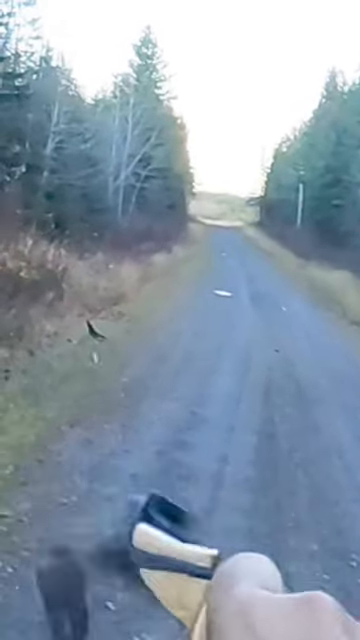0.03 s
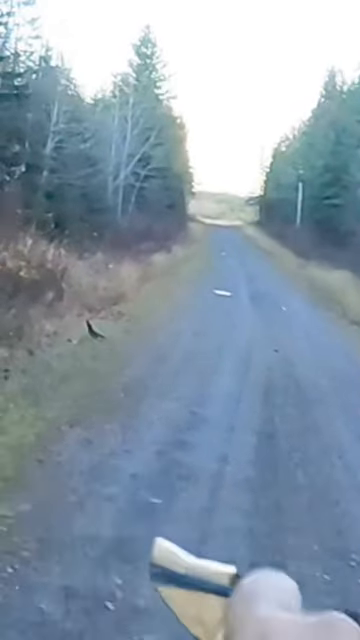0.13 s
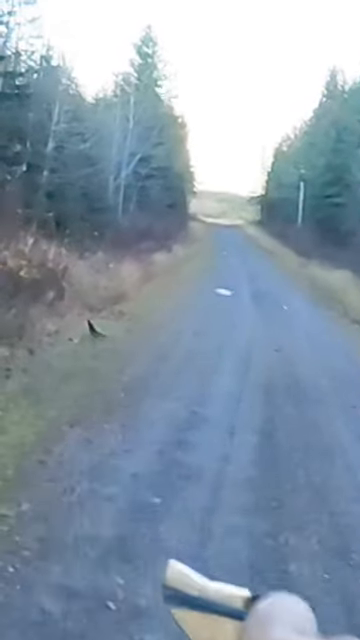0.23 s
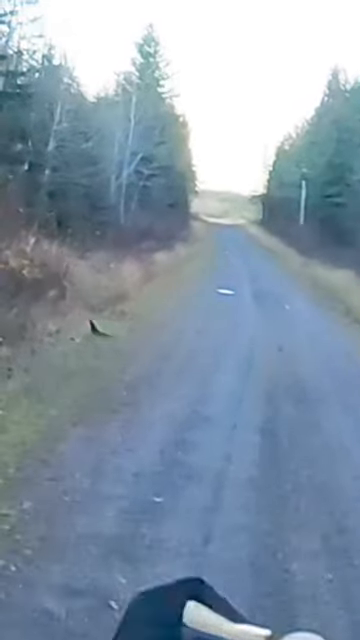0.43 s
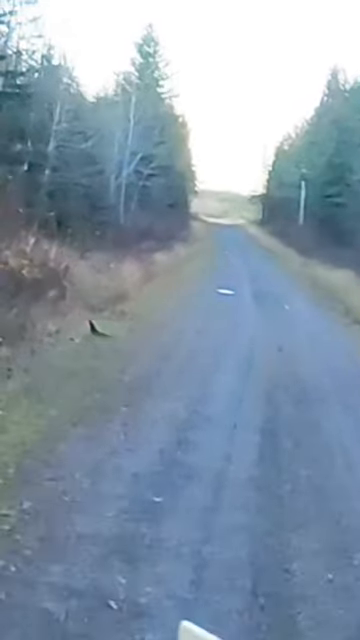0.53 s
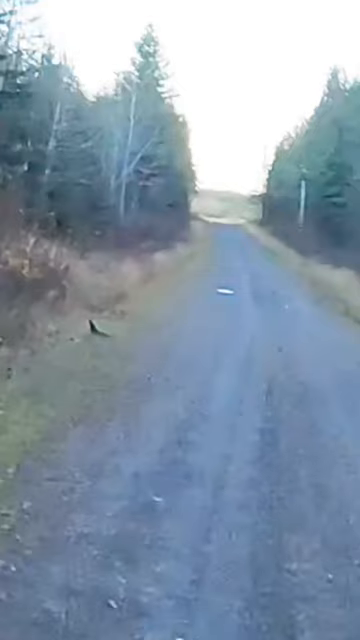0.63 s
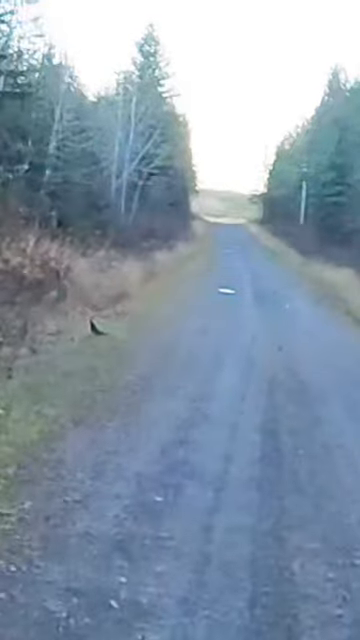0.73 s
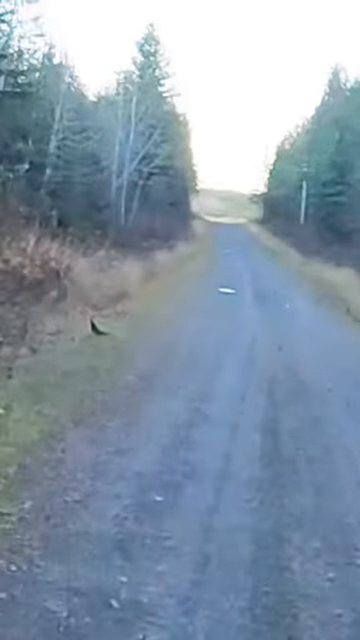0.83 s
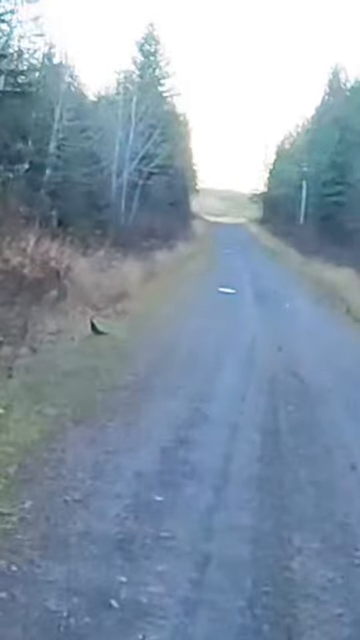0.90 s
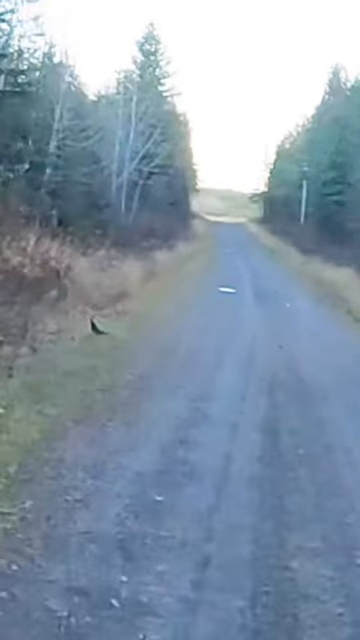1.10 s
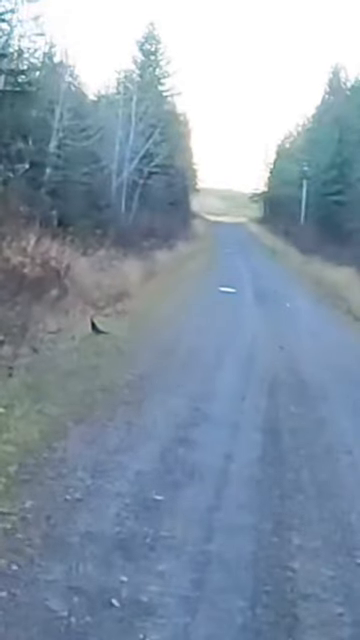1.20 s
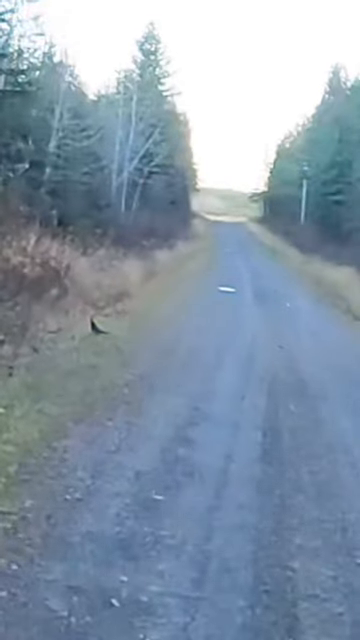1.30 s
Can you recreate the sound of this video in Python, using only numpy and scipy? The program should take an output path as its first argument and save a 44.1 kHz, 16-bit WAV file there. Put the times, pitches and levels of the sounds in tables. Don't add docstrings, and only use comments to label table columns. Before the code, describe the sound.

A slingshot fires close to a dull, muffled microphone. Soft air, low wind rumble and sleeve rustle come first, with tiny rubber creaks from 0.1 s. At 0.22 s two low pops lead into a rising swish, then a loud, short ringing snap at 0.28 s with recoil thumps. Bands flap until 0.41 s; faint distant knocks follow around 0.48-0.6 s as the tree echo fades into quiet air.

```python
import sys
import numpy as np
from scipy import signal
from scipy.fft import rfft, irfft
from scipy.io import wavfile

SR = 44100
rng = np.random.default_rng(int(sys.argv[2]) if len(sys.argv) > 2 else 0)


def int16_out(signal):
    q = np.round(np.clip(np.atleast_2d(signal).T, -1, 1) * 32767)
    wavfile.write(sys.argv[1], SR, q.astype(np.int16))


def attenuation_scalar(level_db):
    decades = np.asarray(level_db, float) / 20
    return 10 ** decades


N = 59535


def read(points, hz):
    f, value = np.transpose(points)
    return np.interp(np.log(hz + 1), np.log(f + 1), value)


def over_time(curve):
    return np.interp(np.arange(N) / SR, *np.transpose(curve))


def sides(pan_db):
    left_right = attenuation_scalar(np.array([[pan_db], [-pan_db]]) / 2)
    return left_right / np.cosh(pan_db * np.log(10) / 40)


# f/Hz, likeness/0..1
PORT_LIKENESS = [(60, 0.98), (120, 1), (230, 0.92), (460, 0.53), (920, 0.8), (1820, 0.94), (3600, 0.12)]


def noise(spectrum, like, flutter_hz, flutter_db):
    hz = np.fft.rfftfreq(N, 1 / SR)
    left, other, slow = rfft(rng.standard_normal((3, N)), axis=1)
    same = np.clip(like * read(PORT_LIKENESS, hz), 0, 1)
    right = same * left + np.sqrt(1 - same ** 2) * other
    x = irfft(np.array([left, right]) * attenuation_scalar(read(spectrum, hz)), N, axis=1)
    flutter = irfft(slow * np.exp(-(hz / flutter_hz) ** 2), N)
    x = x * attenuation_scalar(flutter_db * flutter / flutter.std())
    return x / x.std()


def pushes(table):
    t = np.arange(N) / SR
    out = np.zeros((2, N))
    for s, width, db, way, pan_db in table:
        out += np.sign(way) * attenuation_scalar(db) * sides(pan_db) * np.exp(-((t - s) / width) ** 2)
    return out


# f/Hz, level/dB
PUFF = [(100, -20), (300, 1), (1000, -0.5), (2400, -8.5), (3400, -19), (4200, -52.5), (5000, -100)]
# f/Hz, phase/radians
PORT_LEAD = [(400, .7), (800, 1.1), (1400, .6), (1800, .4), (3000, .5)]


def rings(table, puff_db, rise_share=.7):
    out, t = np.zeros((2, N)), np.arange(N) / SR
    wobble = .03
    puff = attenuation_scalar(puff_db) * noise(PUFF, like=1.02, flutter_hz=306.7, flutter_db=5.0)
    for s, hz, db, ring, pan_db in table:
        u = np.clip((t - s) / ring, -30, 30)
        shape = 2 / (np.exp(-u * 2 / rise_share) + np.exp(u * 1.5))
        lead = np.array([[0], [read(PORT_LEAD, hz)]])
        bend = wobble * hz * ring * np.sin(2.5 * u)
        tone = np.cos(2 * np.pi * hz * (t - s) + lead + bend)
        out += attenuation_scalar(db) * sides(pan_db) * shape * (tone + puff)
    return out


# f/Hz, level/dB
AIR = [(200, -19.5), (600, 2.5), (1200, 1), (1800, -8), (2200, -18), (3200, -35), (4000, -53.5),
       (5000, -100)]


def forest_air():
    return attenuation_scalar(-59.5) * noise(AIR, like=1.01, flutter_hz=30.14, flutter_db=0.4)


# f/Hz, level/dB
ECHO = [(200, -22.5), (600, -8), (1300, -1), (1900, -0.5), (2400, -18), (3050, -15), (3700, -23.5),
        (4600, -91)]


def forest_echo():
    start_s, rise_s, level_db, t60_s = 0.32, 0.09, -48.5, 1.67
    u = np.maximum(np.arange(N) / SR - start_s, 0)
    tail = (1 - np.exp(-u / rise_s)) * attenuation_scalar(level_db - 60 * u / t60_s)
    return tail * noise(ECHO, like=1.1, flutter_hz=59.2, flutter_db=1.0)


# f/Hz, level/dB
RUMBLE = [(3, -10), (10, 2), (25, -10), (50, -14), (80, -25.5), (150, -46), (300, -92.5)]


def wind():
    return attenuation_scalar(-36.5) * noise(RUMBLE, like=.9, flutter_hz=6.6, flutter_db=0.5)


# f/Hz, level/dB
RUSTLE = [(40, -35), (90, 2), (200, -2), (400, -7), (600, -20), (900, -46.5), (1500, -86.5)]
# t/s, level/dB
SLEEVE = [(0.0, -50.5), (0.15, -50), (0.258, -40), (0.45, -65.5), (0.526, -66), (0.804, -63.5), (1.0, -56),
          (1.12, -54.5), (1.244, -56), (1.35, -55)]


def sleeve():
    return attenuation_scalar(over_time(SLEEVE) + 4) * noise(RUSTLE, like=.98, flutter_hz=25, flutter_db=1.0)


# t/s of peak, f/Hz, level/dB, ring/s, pan/dB (left over right)
CREAKS = [
    (.105, 1500, -58, 0.0037, 3.5),
    (.143, 1890, -55, .0012, 2),
    (.172, 2000, -61, 0.0051, -1),
    (.195, 3000, -64, 0.0031, 6),
    (.1965, 810, -33, .003, 4.5),
    (.199, 455, -39, 0.0057, 6),
]


def draw_creaks():
    return rings(CREAKS, puff_db=-7)


# t/s of peak, f/Hz, level/dB, ring/s, pan/dB
LANDING = [(0.58, 1500, -49, 0.0014, 3), (.477, 760, -43, 0.0018, -1), (.4850, 1080, -36, 0.0025, -6.5),
           (.4852, 470, -47, .002, -6), (.483, 280, -45, .004, -4), (.532, 300, -49, .005, 1),
           (.4851, 750, -49, .002, -4), (.5395, 2300, -54, .001, 1), (.5323, 1550, -38, 0.0015, -2),
           (0.459, 1200, -49, 0.003, 0), (.588, 1890, -50, 0.00079, 6), (.696, 596, -65, 0.0015, 6.5)]


def landing():
    return rings(LANDING, puff_db=-9, rise_share=.35)


# t/s, half width/s, level/dB, push/+1 or -1, pan/dB
JOLTS = [(.2165, 0.0056, -12.5, -1, -1.5), (.2325, 0.0055, -12.5, -1, -0.5), (.245, .004, -23.5, 1, -5),
         (.263, 0.0091, -9.5, 1, -2.5), (.2805, .003, -28, -1, -1), (.2788, .0014, -18, 1, -8),
         (.2818, .0014, -18, -1, -20), (.2885, .0045, -10, 1, -1), (.299, 0.0064, -18, -1, -22.5),
         (.415, .01, -32, 1, 0), (.295, 0.0054, -22.5, 1, 20), (.342, .012, -31.5, 1, -12.5),
         (.47, 0.027, -25, -1, -4), (.525, 0.0224, -24.5, 1, -3.5)]


def recoil():
    return pushes(JOLTS)


# t/s of peak, f/Hz, level/dB, ring/s, pan/dB
FLAPS = [(.306, 1680, -29, 0.0014, 5.5), (.3095, 800, -33, 0.0014, -10), (.297, 3000, -43, .002, -3),
         (.314, 3000, -48, .002, 0), (.3145, 1520, -28.5, 0.0018, 1.5), (.333, 1340, -35.5, 0.0017, -5),
         (.335, 3050, -52, 0.0028, 3.5), (.343, 1660, -37.5, 0.0015, 1), (.3435, 2330, -49, 0.0024, -3),
         (.371, 493, -41, 0.0013, -3), (.390, 1390, -48, 0.0022, -1), (.4143, 1600, -41.5, 0.0013, -2)]


def flaps():
    return rings(FLAPS, puff_db=-8, rise_share=.4)


# t/s, level/dB
SWISH_SPEED = [(0.17, -56), (0.196, -42), (0.226, -37), (0.264, -26), (0.274, -28), (0.288, -24.5),
               (0.3, -38), (0.31, -35), (0.36, -61.5)]
# f/Hz, level/dB
SWISH_TONE = [(100, -28), (300, 1), (800, -0.5), (1450, -0.5), (1900, -2.5), (2500, -15.5), (3070, -21),
              (4100, -46.5), (5000, -100)]
# t/s, f/Hz
WHISTLE = [
    (.19, 1850),
    (.24, 1850),
    (.264, 1400),
    (.3, 1500),
]


def swish():
    t = np.arange(N) / SR
    gate = np.clip((t - .15) / 0.01, 0, 1) * np.clip((.42 - t) / 0.079, 0, 1)
    level_db = np.minimum(over_time(SWISH_SPEED) + 0.5, -24)
    air = noise(SWISH_TONE, like=0.98, flutter_hz=149, flutter_db=1)
    whistle_width_hz, whistle_db = 350, -10
    turn = np.exp(2j * np.pi * np.cumsum(over_time(WHISTLE)) / SR)
    r = np.exp(-np.pi * whistle_width_hz / SR)
    whistle = (turn * signal.lfilter([1], [1, -2 * r, r * r], air / turn)).real
    return gate * attenuation_scalar(level_db) * (air + attenuation_scalar(whistle_db) * whistle / whistle.std())


# t/s, half width/s, level/dB, push/+1 or -1, pan/dB
POPS = [
    (.2156, .0004, -12, 1, 8),
    (.21615, .00028, -11, -1, 12),
    (.2167, .0003, -22, 1, -14),
    (.2176, .0003, -15, 1, 14),
    (.2183, .00042, -6.5, -1, 14),
    (.21812, .0004, -18, -1, -20),
]
# t/s, half width/s, level/dB, push/+1 or -1, pan/dB
AFTERPOPS = [
    (.2206, .0004, -18, -1, 8),
    (.2227, .0006, -18, -1, 8),
    (.2255, .0005, -22, 1, 6),
    (.4838, .0005, -40, -1, -8),
]


def pouch_pops():
    return pushes(POPS) + pushes(AFTERPOPS)


# t/s of peak, f/Hz, level/dB, ring/s, pan/dB
SLAPS = [(.2762, 1400, -9, .0022, -2), (.2791, 1700, -5, .0024, -0.5), (.2785, 1150, -9, .0015, -4.5),
         (.2809, 850, -9, 0.0028, -1.5), (.2786, 2300, -13.5, .0025, -3), (.2796, 3030, -22, .004, -8.5),
         (.2795, 3900, -39, .005, -10), (.2856, 1500, -20, .0015, -3), (.2755, 1400, -18, .0015, -8),
         (.2776, 1450, -15, .0008, 2), (.2885, 1750, -23, .002, -0.5), (.2802, 2050, -15, .002, 2),
         (.2175, 3300, -49.5, 0.0021, 2.5)]


def slaps():
    return rings(SLAPS, puff_db=-19.5)


# t/s, half width/s, level/dB, push/+1 or -1, pan/dB
BLOW = [
    (.2826, .00035, -8, -1, -5),
    (.28315, .00022, -8, 1, -20),
    (.2833, .0002, -11, 1, 20),
    (.28365, .00018, -16, -1, -10),
    (.2842, .0002, -16, -1, 10),
]


def fork_blow():
    return pushes(BLOW)


def housing(x):
    ring_hz, width_hz, boost_db = 3050, 58, 7.5
    hz = np.fft.rfftfreq(N, 1 / SR)
    bell = boost_db / (1 + (2 * (hz - ring_hz) / width_hz) ** 2)
    return irfft(rfft(x, axis=1) * attenuation_scalar(bell), N, axis=1)


def scene():
    airborne = forest_air() + forest_echo() + draw_creaks() + landing() + swish()
    near = wind() + sleeve() + recoil() + flaps() + pouch_pops() + slaps() + fork_blow()
    return near + housing(airborne)


# t/s, half width/s, level/dB, push/+1
# or -1, pan/dB
TICKS = [
    (.27855, .00004, -33, -1, -30),
    (.27912, .00004, -34, -1, -30),
    (.27959, .00003, -49, -1, -14),
    (.27381, .00005, -50, 1, -3),
    (.27672, .00005, -53, 1, -3),
    (.28252, .00005, -50, -1, -7),
]


def faint_ticks():
    return pushes(TICKS)


def top_cut(x):
    return signal.sosfilt(signal.butter(12, 16000, fs=SR, output="sos"), x)


def record(dry):
    ceiling, edge_hz = .92, 4210
    held = dry / (1 + (abs(dry) / ceiling) ** 16) ** (1 / 16)
    low_pass = signal.firwin(151, edge_hz, window=("kaiser", 9), fs=SR)
    dull = signal.oaconvolve(held, low_pass[None], "same")
    return top_cut(dull + faint_ticks())


dry = scene()
out = record(dry)
int16_out(out)
```